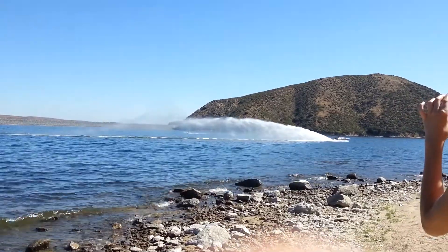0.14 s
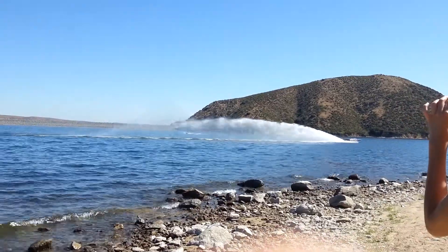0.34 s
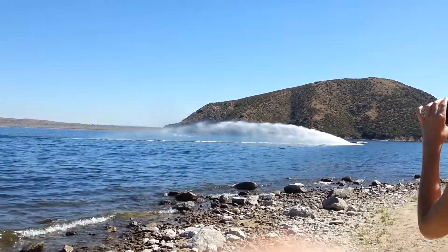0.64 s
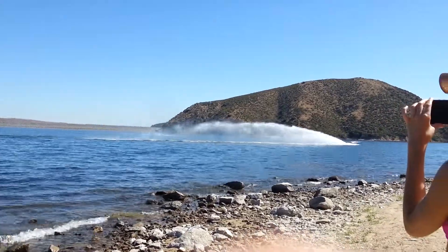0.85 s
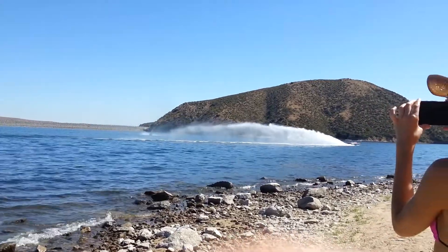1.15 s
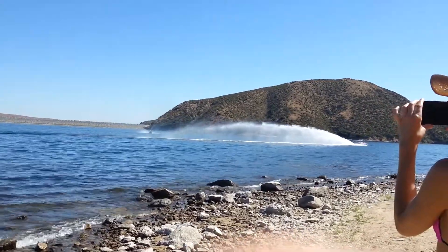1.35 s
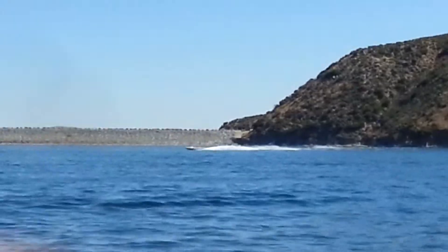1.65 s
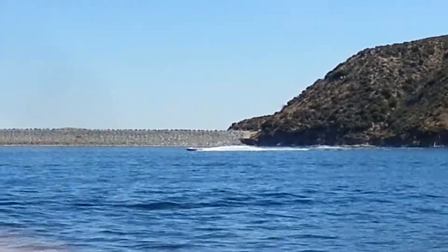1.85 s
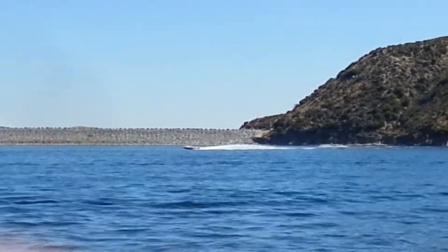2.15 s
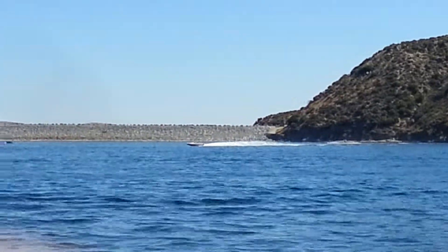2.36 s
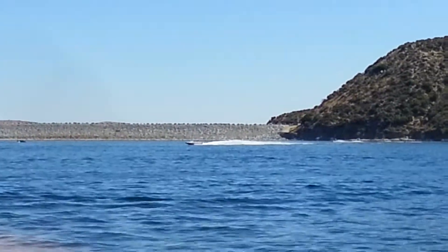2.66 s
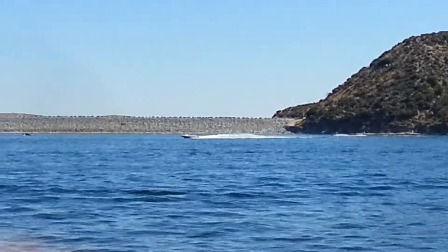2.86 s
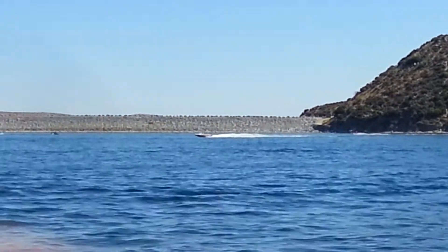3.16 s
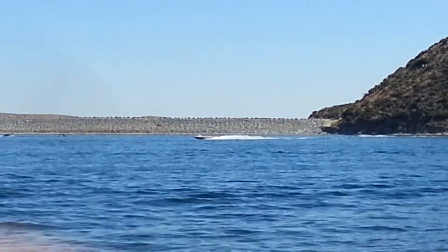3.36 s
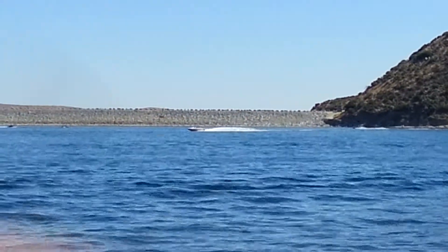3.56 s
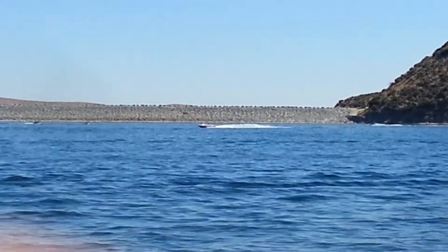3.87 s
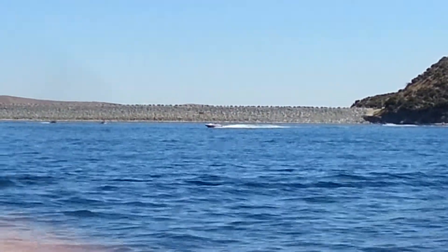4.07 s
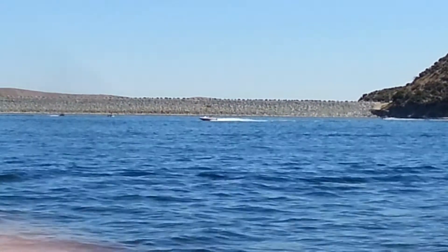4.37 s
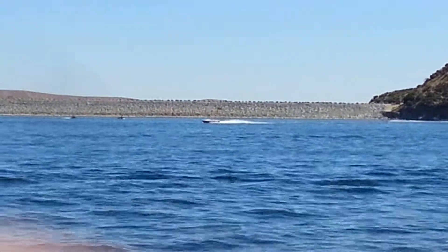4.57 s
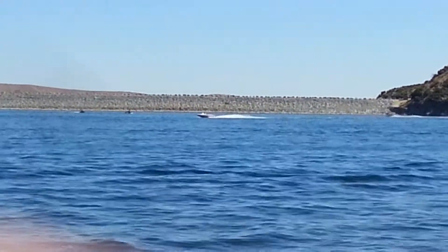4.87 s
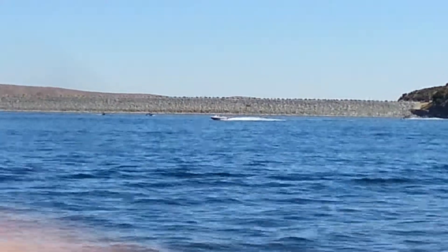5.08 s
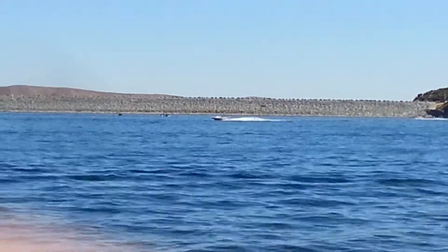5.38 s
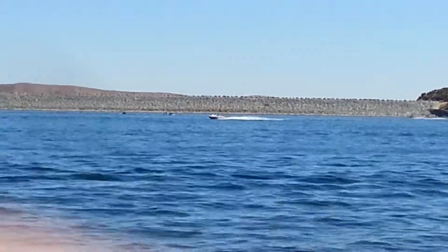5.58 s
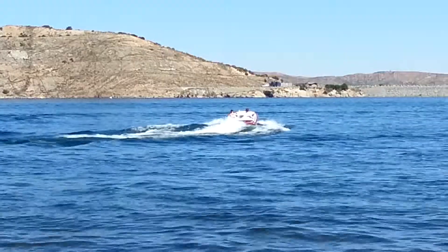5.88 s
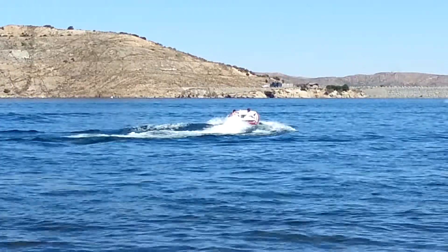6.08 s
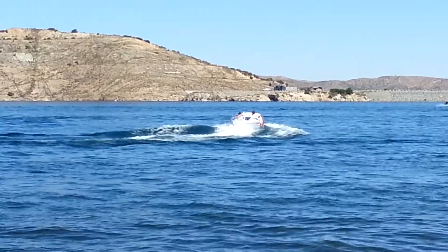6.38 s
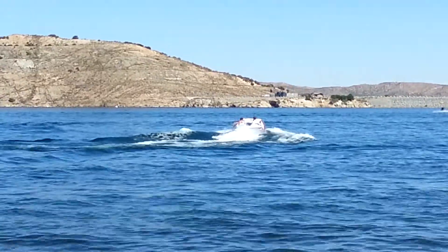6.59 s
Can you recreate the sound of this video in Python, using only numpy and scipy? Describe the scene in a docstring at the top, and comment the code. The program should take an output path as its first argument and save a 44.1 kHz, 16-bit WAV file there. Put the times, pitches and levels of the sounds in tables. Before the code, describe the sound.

A jet boat's V8 roars hard across a lake, cuts to a distant fainter drone that throttles down, then cuts back loud, close and lumpy.

```python
"""A jet boat on a lake, heard from the shore by two microphones, in three joined passages: running hard nearby,
far off where it throttles back over the drone of another boat, then close and climbing onto the plane.
Each engine cycle rings the exhaust on its orders (multiples of the cycle rate), timed by uneven firings.
Jet roar and spray are shaped noise with a bounce off the water; nearby and close they puff with the cycle.
Drops and pebbles at the shore are short damped rings."""
import sys
import numpy as np
from scipy import signal
from scipy.fft import rfft, irfft, next_fast_len
from scipy.io import wavfile
from scipy.ndimage import uniform_filter1d, map_coordinates

SR = 44100
rng = np.random.default_rng(int(sys.argv[2]) if len(sys.argv) > 2 else 0)


def pcm_store(signal):
    """Save signal as 16-bit PCM."""
    levels = np.round(np.clip(np.atleast_2d(signal), -1, 1) * 32767)
    wavfile.write(sys.argv[1], SR, levels.astype(np.int16).T)


N = 296793

# Edges of the three passages: time_s
PASSAGE_EDGES = [0, 1.506, 5.728, 6.8]

# Exhaust orders of each passage: order (multiple of the cycle rate), level_db
NEAR_ORDERS = [(3, -27.5), (4, -30), (5, 2), (6, -6.5), (7, -6.5), (8, -17), (9, -11.5), (10, -17.5),
               (11, -20), (12, -24), (13, -21.5), (14, -26), (15, -34), (16, -36), (17, -31), (18, -32.5),
               (19, -52), (20, -36), (21, -53), (22, -27.5), (23, -33.5), (24, -35.5), (25, -32.5),
               (26, -36.5), (27, -30.5), (28, -38.5), (29, -36), (30, -41.5), (31, -48), (32, -36),
               (33, -41), (34, -39), (35, -38), (36, -34.5), (37, -42.5)]
FAR_ORDERS = [(4, -30), (5, -0.5), (6, -3), (7, -7), (9, -10.5), (10, -12), (11, -16.5), (12, -16),
              (13, -22.5), (14, -18.5)]
CLOSE_ORDERS = [(3, -31), (4, -26.5), (5, -10.5), (6, -5.5), (7, -14), (8, 1), (10, -14), (11, -16.5),
                (12, -20.5), (14, -20.5), (15, -25.5), (17, -33), (18, -30), (19, -32), (20, -21.5),
                (21, -19.5), (22, -20.5), (23, -21.5), (24, -27), (25, -29), (26, -33), (29, -31),
                (30, -31.5), (31, -29), (32, -33.5)]
# Far orders that stand out while the throttle is open: order, level_db
FAR_OPEN_ORDERS = [(8, -5), (18, -16.5), (19, -15), (23, -18)]
# Close orders that swell or fade as the boat turns: order, start_level_db, slope_db_per_s
CLOSE_TURNING_ORDERS = [(9, -7.5, -9), (13, -14.5, -7), (16, -27, 6), (27, -33, 11), (28, -20.5, -6)]

# Firing points of the V8, four to a bank: moment_cycles
FIRING_CYCLES = np.array([1, 3, 4, 7, 0, 2, 5, 6]) / 8
# The two pipes as heard: eight firing strengths (0-1), delay_cycles of both, extra_delay_cycles of the second,
# pulse_phase_rad, sweep_rad per order squared
NEAR_FAR_PIPES = [.29, .51, 1, .25, .94, .21, .55, .72], .373, .415, .13, .001
CLOSE_PIPES = [.59, .36, 1, .49, .97, .42, .58, .22], -.127, .269, 6.225, -.03255
# The two sharpest firings, which own the high orders: first_cycles, second_cycles, second_strength (0-1),
# phase_rad, sweep_rad per order squared
NEAR_FAR_CRACK = .477, 0, 0, 0, .056
CLOSE_CRACK = .339, .26, .85, 3.03, .042

# Roar of jet, spray and waves: start_s, level_db, growl_db, growl_hz, rasp_db (near 2.5 kHz),
# hiss_db (narrow, near 3 kHz), treble_db
NEAR_ROAR = [(0, -20.5, -2.5, 884, -0.3, -7, -1), (.25, -20.5, -1, 870, -2.5, -3, -2),
             (.4, -21.5, 4.5, 760, 2, 4, .3), (.6, -22, 0.5, 770, 0, 0.5, -0.3),
             (.8, -23, 1.5, 856, 1, -1.5, 1), (1.05, -25, 4.5, 900, 3, 2.5, 4),
             (1.19, -23, 10.5, 910, 0.5, 2, 2), (1.28, -24.5, 5.5, 860, 2.5, -1, 2),
             (1.5, -24.5, 9.5, 820, 4, -0.5, 3)]
FAR_ROAR = [(1.51, -32, -2.5, 700, 2, 0, -1), (2.1, -30, 0.5, 700, -2.5, 2, -2.5),
            (2.35, -30.5, -2, 700, 0.6, 3.5, 0.9), (2.95, -31, 3.5, 750, 1, 2, 1.5),
            (3.35, -32, 1, 760, 0, 1, 0), (3.6, -29.5, 3.5, 770, -0.9, 0, -0.6),
            (4.3, -30, 5, 776, -2.2, -1.5, -4.5), (4.75, -30.5, 1.5, 780, 1.5, 0, -0.5),
            (5.2, -30.5, 2.5, 800, 2.5, 2, 2), (5.72, -30, 1, 800, 0.2, 0, -0.5)]
CLOSE_ROAR = [(5.73, -24.5, .1, 804, 1.5, -0.5, 1.5), (5.95, -24, .1, 796, 1, 3, -1),
              (6.1, -23, .1, 800, 0.5, -4.5, -0.5), (6.3, -23, .1, 800, -2.5, 8, -2),
              (6.45, -23.5, 0.12, 810, 1, 2, -2), (6.65, -23, 0.11, 800, 4, 0.5, -3.5),
              (6.73, -23, 0.092, 795, 3.5, 6.5, -1.5)]
# Spectrum of the roar: pitch_hz, density_db (relative, per Hz)
NEAR_COLOUR = [(25, -58), (70, -21), (100, -11.5), (170, -1), (340, 1.5), (520, -13.5), (700, -15.5),
               (930, -12), (1100, -12.5), (1300, -18.5), (2000, -20.5), (2700, -21), (3100, -18.5),
               (3500, -20.5), (4400, -23), (5300, -30), (6500, -33.5), (9500, -38.5), (14000, -58.5)]
FAR_COLOUR = [(25, -62), (70, -21), (115, -13.5), (170, -1.5), (340, -8), (520, -11.5), (800, -9),
              (1300, -11.5), (1700, -17.5), (2000, -19), (3100, -21.5), (3700, -20.5), (4200, -20.5),
              (5200, -30.5), (6500, -32), (9500, -34), (14000, -39.5)]
CLOSE_COLOUR = [(25, -44), (70, -27), (100, -22), (200, 3.5), (310, 4.5), (400, -8.5), (520, -10.5),
                (800, -10), (1000, -15), (1290, -24), (1400, -22), (1600, -16), (2000, -16), (2250, -16.5),
                (2600, -18), (2900, -22.5), (3200, -17.5), (3480, -27), (3650, -19.5), (4200, -22.5),
                (6500, -33), (9500, -36.5), (14000, -57)]
# Left-right likeness of the roar: pitch_hz, correlation (0-1)
NEAR_ALIKE = [(60, .99), (180, .995), (530, .93), (1580, .5), (4690, .36), (14000, 0)]
FAR_ALIKE = [(60, 0.95), (300, 1), (1000, 0.62), (2500, 0.6), (5000, 0.22), (14000, 0.05)]
CLOSE_ALIKE = [(60, .98), (180, .995), (530, .93), (1580, .68), (3000, .8), (5500, .66), (10000, .12)]
# Bands of the roar that puff with the cycle: from_hz, to_hz, depth (0-1), sharpness, moments (eighths of a cycle)
NEAR_PUFFS = [(544, 1300, 0.62, 3.7, [1, 3.8, 6.27]), (1200, 3500, 0.16, 3, [0.2, 3.6])]
CLOSE_PUFFS = [(450, 1300, .6, 2, [2.5]), (1300, 2400, .5, 2, [1.5]), (2400, 4500, .3, 2, [7.3])]

# Drops and pebbles at the shore: start_s, level_db, pitch_hz, pan_db (left minus right)
TICKS = [(.0444, -29.5, 9300, 3), (.3985, -22.5, 3170, -2), (.6295, -32, 2890, -1),
         (.8784, -23.5, 2760, .5), (1.2386, -26, 2930, 2), (1.5505, -37.5, 6460, -11),
         (2.7555, -35.5, 915, 2.5), (2.9501, -34, 978, 4), (3.142, -31.5, 4440, -4), (3.1676, -33, 1252, 6),
         (3.171, -31.5, 4760, -12), (3.188, -32, 4330, -3), (3.7323, -38, 1225, -4),
         (4.43, -30.5, 2670, -6), (4.4865, -36.5, 6460, -1), (4.5435, -35.5, 1024, 2.5),
         (4.5729, -35, 1384, 8), (4.593, -34.5, 2520, 2.5), (4.9321, -33.5, 1116, -3),
         (5.083, -33, 7260, -5.5), (6.1455, -32, 8470, 6.5)]
# Drone of the other boat: pitch_hz, level_db
DRONE = [(86.5, -49), (108, -45), (172, -39), (194, -47.5), (216, -44.5), (237, -39.5), (263, -37),
         (347, -48)]
# Far engine, throttle open and then eased: cycle_hz, level_db, fifth_lift_db
FAR_OPEN = (36.6, -36.5, 11)
FAR_EASED = (29, -36, 1.6)
# Colour difference of the two microphones: pitch_hz, left_minus_right_db
MICROPHONES = [(60, .4), (250, .4), (600, -.4), (2000, 1), (4000, .1), (8000, -2.8), (13000, -.1)]

# Nearby: the cycle rate sags as the boat draws away; all orders but the fifth start under their level and grow
NEAR_HZ, NEAR_SAG_HZ_PER_S, NEAR_DB = 34.02, .204, -13
NEAR_OPENS_DB, NEAR_OPENS_S = 8, .2  # how far under, time constant
NEAR_FIFTH_DB, NEAR_FIFTH_DB_PER_S = 1, -2.5  # lift of the fifth order at the start, and its slope
# Far off: the throttle closes, the revs creep back up, the boat turns away
THROTTLE_S, EASING_S, CREEP_HZ_PER_S = 3.39, .26, .58
EASED_LOSS_DB = -12  # further change of the open-throttle orders
TURN_S, TURN_FIFTH_DB, TURN_DB = 4.58, -12, -3  # the fifth order drops out, the rest dims
DRONE_NEARS_DB = 1.5  # the drone grows by this during the turn
# Close by: the cycle rate is lowest at LIFT_S, then climbs ever faster as the hull lifts
CLOSE_HZ, LIFT_S, CLIMB_HZ_PER_S2, CLOSE_DB = 29.249, 5.969, 1.379, -13.5
LAPPING_DB = .35  # scale of the quick random swells of the treble
TOP_HZ = 14600  # band limit


def amp(db):
    """Decibels to amplitude."""
    return 10 ** (np.asarray(db) / 20)


def unit(x):
    """x scaled to an rms of one."""
    return x / np.sqrt(np.mean(x ** 2) + 1e-20)


def along(points, hz):
    """(Hz, value) points read on a log frequency axis."""
    f, v = np.transpose(points)
    return np.interp(np.log(hz + 1), np.log(f + 1), v)


def curves(rows, t):
    """Each column after the time, read at the times t."""
    s, *cols = np.transpose(rows)
    return [np.interp(t, s, c) for c in cols]


def wobble(n, rate):
    """A smooth random curve of n samples through rate knots a second."""
    knots = rng.standard_normal(int(n * rate / SR) + 4)
    coarse_at = np.arange(0, n + 64, 64)
    coarse = map_coordinates(knots, [coarse_at * rate / SR])
    return np.interp(np.arange(n), coarse_at, coarse)


def filtered(x, response):
    """x times a complex response of frequency."""
    n = x.shape[-1]
    m = next_fast_len(n + 4096)
    return irfft(rfft(x, m) * response(np.fft.rfftfreq(m, 1 / SR)), m)[..., :n]


def left_right(pan_db):
    """Gains of the two channels, the left pan_db louder."""
    return amp(pan_db * np.array([[.5], [-.5]]))


def at_microphones(x, lag_ms, pan_db):
    """The left microphone hears the source lag_ms after the right one and pan_db louder."""
    delay_s = np.array([[max(lag_ms, 0)], [max(-lag_ms, 0)]]) / 1000
    return left_right(pan_db) * filtered(x, lambda hz: np.exp(-2j * np.pi * hz * delay_s))


def exhaust(t, state, orders, pipes, crack, flutter_db, drift, rate):
    """Orders of the cycle, phased by the uneven firing of the two banks; moving air over the water
    makes each flutter in level and phase, the high ones most."""
    turn, level_db, fifth_lift_db = state
    strengths, delay, second_delay, pulse, sweep = pipes
    first_at, second_at, share, crack_phase, crack_sweep = crack
    moments = FIRING_CYCLES + delay + second_delay * (np.arange(8) > 3)
    out = np.zeros(len(t))
    for k, db in orders:
        k = round(k)
        if k > 16:  # high orders come from the two sharpest firings alone
            pair = np.exp(-2j * np.pi * k * first_at) + share * np.exp(-2j * np.pi * k * second_at)
            fired = np.angle(pair) + crack_phase + crack_sweep * (k - 24) ** 2
        else:
            firings = np.dot(strengths, np.exp(-2j * np.pi * k * moments))
            fired = np.angle(firings) + pulse + sweep * k * k
        phase = 2 * np.pi * k * turn + fired + drift * k ** .8 * wobble(len(t), rate)
        flutter = flutter_db * k ** .8 * wobble(len(t), rate)
        out += amp(db + flutter + fifth_lift_db * (k == 5)) * np.cos(phase)
    return amp(level_db) * out * np.sqrt(2)


def roar(t, rows, colour, alike, patchy_db, bounce, bounce_ms, hiss_hz):
    """Stereo noise with random patches, doubled by the bounce off the water, which ripples scatter in the treble."""
    hz, s, z = signal.stft(rng.standard_normal((2, len(t))), SR, nperseg=512)
    hz = hz[:, None]
    patches = uniform_filter1d(rng.standard_normal(z.shape[1:]), size=6, axis=0)
    patches = uniform_filter1d(patches, size=10, axis=1)

    _, growl_db, growl_hz, rasp_db, hiss_db, treble_db = curves(rows, t[0] + s)
    lapping = wobble(len(t) + 512, 6)[::256][:len(s)]  # one value per frame
    treble_db = treble_db + LAPPING_DB * lapping  # wavelets break unevenly
    octave = np.log2((hz + 1) / 2500)
    spray_db = rasp_db * np.exp(-octave ** 2) + treble_db * np.clip(octave - .5, 0, 1.5)
    growl_octave = np.log2((hz + 1) / growl_hz)
    throat_db = growl_db * np.exp(-(growl_octave / .12) ** 2)
    throat_db = throat_db + hiss_db * np.exp(-((hz - hiss_hz) / 160) ** 2)
    shaped = z * amp(patchy_db * unit(patches) + spray_db + throat_db)
    pair = signal.istft(shaped, SR, nperseg=512)[1][:, :len(t)]

    def response(f):
        width = np.arccos(np.clip(along(alike, f), -1, 1)) / 2  # mid-side angle giving this likeness
        comb = 1 + bounce * np.exp(-2j * np.pi * f * bounce_ms / 1000 - (f / 4600) ** 2)
        return amp(along(colour, f)) * comb * [np.cos(width), np.sin(width)]

    mid, side = filtered(pair, response)
    return amp(curves(rows, t)[0]) * unit(np.array([mid + side, mid - side]))


def puffed(noise, turn, puffs):
    """Bands of the roar swell at their own moments of the engine cycle."""
    out = noise
    for lo_hz, hi_hz, depth, sharp, eighths in puffs:
        band = filtered(noise, lambda f: (f >= lo_hz) & (f < hi_hz))
        swell = sum(np.exp(sharp * (np.cos(2 * np.pi * (turn - e / 8)) - 1)) for e in eighths)
        out = out + band * (unit(1 + depth * swell) - 1)
    return out


def near(t):
    """Flat out across the bay: the cycle rate sags steadily and the roar puffs with the firings."""
    opening_db = NEAR_OPENS_DB * np.exp(-t / NEAR_OPENS_S)
    turn = .997 + np.cumsum(NEAR_HZ - NEAR_SAG_HZ_PER_S * t) / SR  # engine cycles
    fifth_db = NEAR_FIFTH_DB + NEAR_FIFTH_DB_PER_S * t + opening_db
    pipes = exhaust(t, (turn, NEAR_DB - opening_db, fifth_db), NEAR_ORDERS, NEAR_FAR_PIPES, NEAR_FAR_CRACK,
                    flutter_db=.36, drift=.06, rate=12)
    noise = roar(t, NEAR_ROAR, NEAR_COLOUR, NEAR_ALIKE, patchy_db=1.4, bounce=.25, bounce_ms=1.35, hiss_hz=3050)
    noise = puffed(noise, turn, NEAR_PUFFS)
    return at_microphones(pipes, lag_ms=-.082, pan_db=.23) + at_microphones(noise, lag_ms=-.081, pan_db=.5)


def ticks(count=70):
    """Damped clicks and plops near the microphones: the clear ones, and a faint scatter of lapping water."""
    u = rng.random((count, 4))
    faint = np.transpose([u[:, 0] * N / SR, -47 + 7 * u[:, 1], 900 * 4.8 ** u[:, 2], 8 * (u[:, 3] - .5)])
    out, t = np.zeros((2, N + 3000)), np.arange(3000) / SR
    onset = 1 - np.exp(-t / .00099)
    for start_s, db, hz, pan_db in [*TICKS, *faint]:
        jitter = np.cumsum(rng.normal(0, .17 * hz / 5000, len(t)))
        ring = np.sin(2 * np.pi * hz * t + jitter)
        decay = amp(db - 60 * t * hz / 120)  # 60 dB down after 120 periods
        out[:, round(start_s * SR):][:, :len(t)] += left_right(pan_db) * decay * ring * onset
    return out[:, :N]


def drone(t, turned):
    """The other boat: steady tones wavering in level and phase, growing as the jet boat turns away."""
    out = np.zeros(len(t))
    for hz, db in DRONE:
        level = amp(db + DRONE_NEARS_DB * turned + 2.94 * wobble(len(t), 6))
        out += level * np.cos(2 * np.pi * hz * t + wobble(len(t), 4.22))
    return out


def far(t):
    """Far off: the closing throttle drops the cycle rate, over the drone of the other boat."""
    eased = (1 - np.cos(np.pi * np.clip((t - THROTTLE_S) / EASING_S, 0, 1))) / 2
    hz, level_db, fifth_db = (a + (b - a) * eased for a, b in zip(FAR_OPEN, FAR_EASED))
    hz = hz + CREEP_HZ_PER_S * np.clip(t - THROTTLE_S - EASING_S, 0, None)
    turn = np.cumsum(hz) / SR  # engine cycles
    turned = np.clip((t - TURN_S) / .14 + .5, 0, 1)
    level_db, fifth_db = level_db + TURN_DB * turned, fifth_db + TURN_FIFTH_DB * turned
    pipes = exhaust(t, (turn, level_db, fifth_db), FAR_ORDERS, NEAR_FAR_PIPES, NEAR_FAR_CRACK,
                    flutter_db=.36 + .2 * eased, drift=.07 + .05 * eased, rate=7)
    pipes = pipes + exhaust(t, (turn, level_db + EASED_LOSS_DB * eased, 0), FAR_OPEN_ORDERS,
                            NEAR_FAR_PIPES, NEAR_FAR_CRACK, flutter_db=.4, drift=.09, rate=9)
    tones = pipes + drone(t, turned)
    noise = roar(t, FAR_ROAR, FAR_COLOUR, FAR_ALIKE, patchy_db=1.3, bounce=.1, bounce_ms=.37, hiss_hz=2760)
    return at_microphones(tones, lag_ms=.016, pan_db=0) + at_microphones(noise, lag_ms=.377, pan_db=.6)


def close(t):
    """Close by under load: clear, lumpy firings, with some orders swelling or fading as the boat turns."""
    turn = .762 + np.cumsum(CLOSE_HZ + CLIMB_HZ_PER_S2 * (t - LIFT_S) ** 2) / SR  # engine cycles

    def ring(level_db, orders):
        return exhaust(t, (turn, level_db, 0), orders, CLOSE_PIPES, CLOSE_CRACK, flutter_db=.16, drift=.02, rate=8)

    pipes = ring(CLOSE_DB, CLOSE_ORDERS)
    for k, db, slope in CLOSE_TURNING_ORDERS:
        pipes = pipes + ring(CLOSE_DB + slope * (t - t[0]), [(k, db)])
    noise = roar(t, CLOSE_ROAR, CLOSE_COLOUR, CLOSE_ALIKE, patchy_db=1.8, bounce=.36, bounce_ms=1.53, hiss_hz=3230)
    noise = puffed(noise, turn, CLOSE_PUFFS)
    return at_microphones(pipes, lag_ms=.05, pan_db=.1) + at_microphones(noise, lag_ms=0, pan_db=.1)


def scene():
    """The three passages end to end, with the shore ticks over all of them."""
    out = np.zeros((2, N))
    for passage, start, end in zip((near, far, close), PASSAGE_EDGES, PASSAGE_EDGES[1:]):
        t = np.arange(round(start * SR), min(round(end * SR), N)) / SR
        # 3 ms fades at the joins; the first passage starts at full level
        fade = np.clip(np.minimum(t - start + (start == 0), end - t) / .003, 0, 1)
        out[:, round(start * SR):][:, :len(t)] = fade * passage(t)
    return out + ticks()


def record(dry):
    """The loudest pulses are rounded off, the microphones differ in colour, nothing is kept above the band limit."""
    soft = dry / (1 + np.abs(dry) ** 8) ** (1 / 8)
    return filtered(soft, lambda hz: left_right(along(MICROPHONES, hz)) * (hz < TOP_HZ))


dry = scene()
out = record(dry)
pcm_store(out)
```